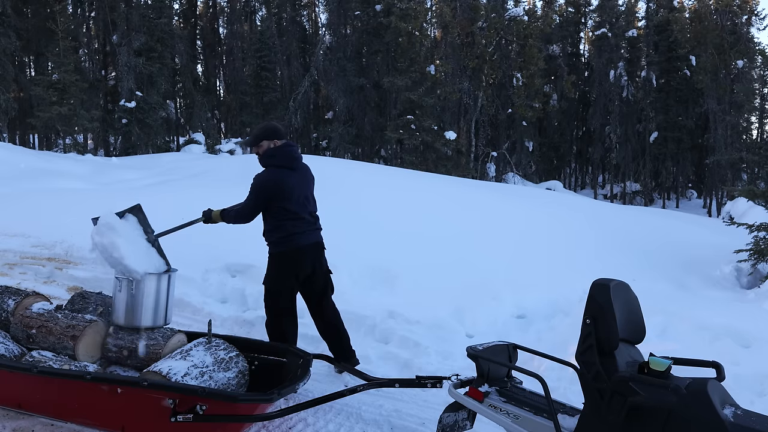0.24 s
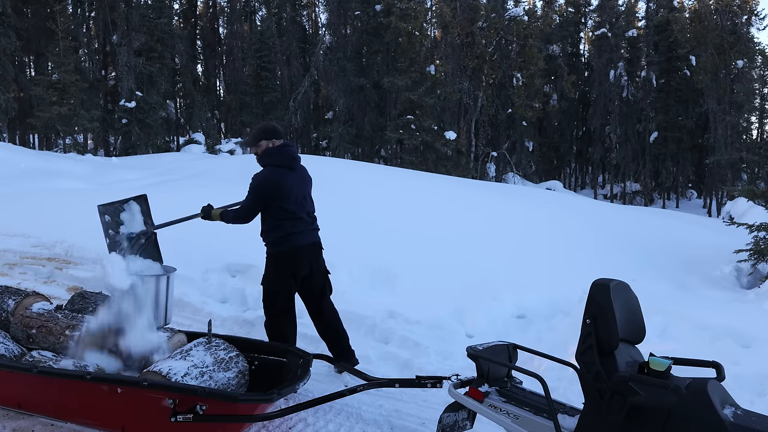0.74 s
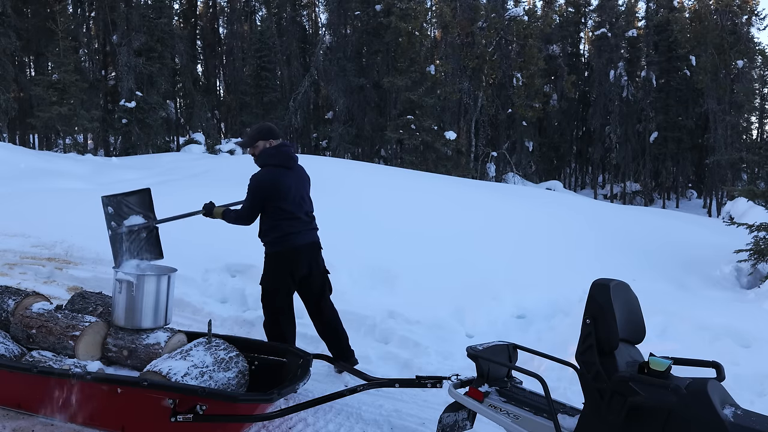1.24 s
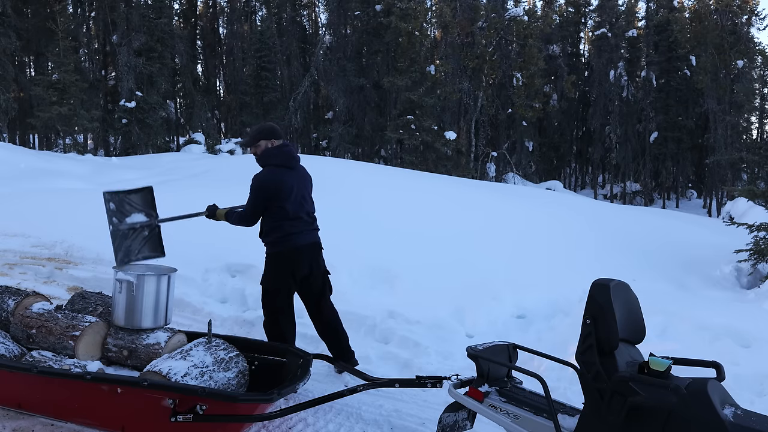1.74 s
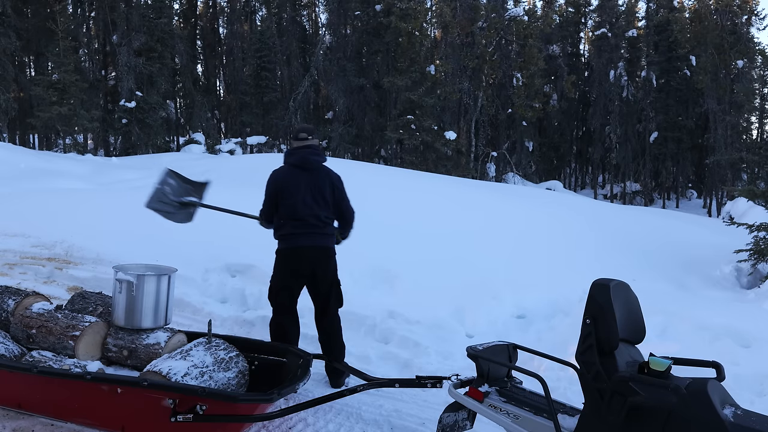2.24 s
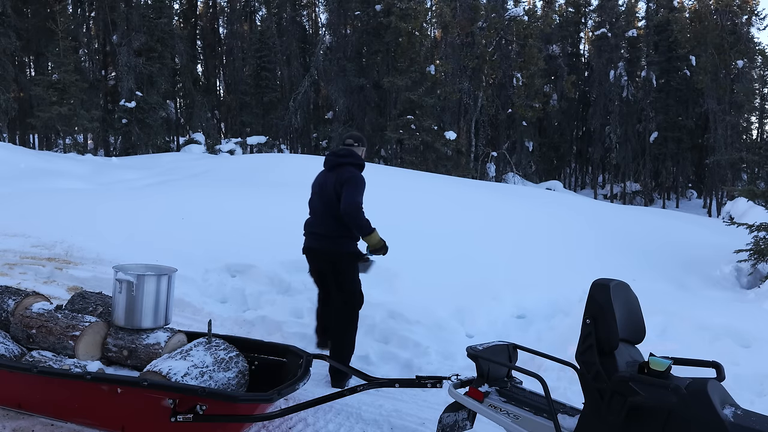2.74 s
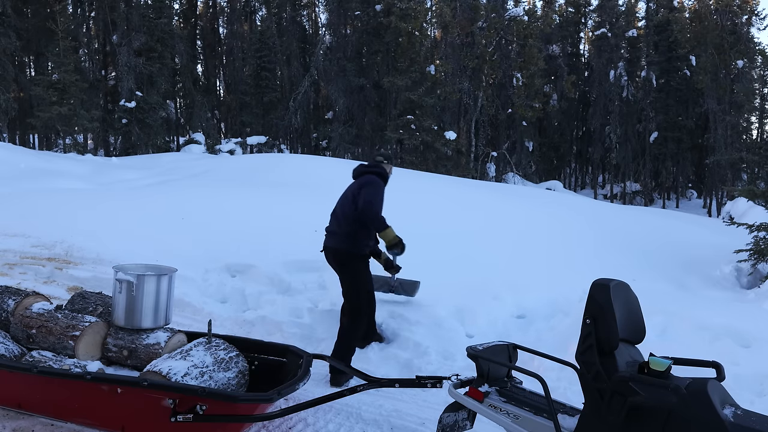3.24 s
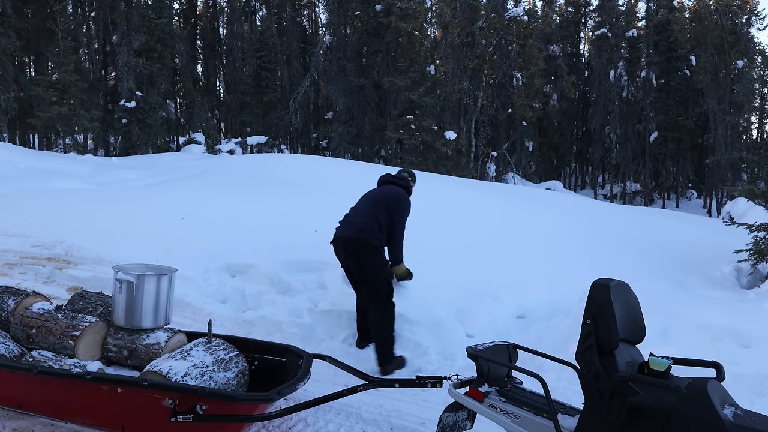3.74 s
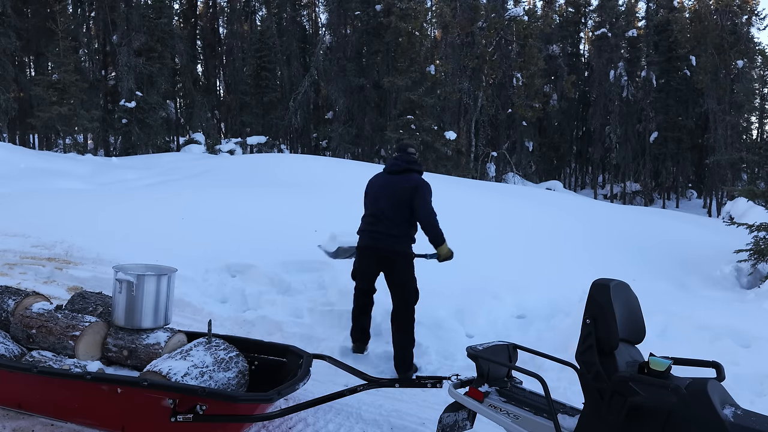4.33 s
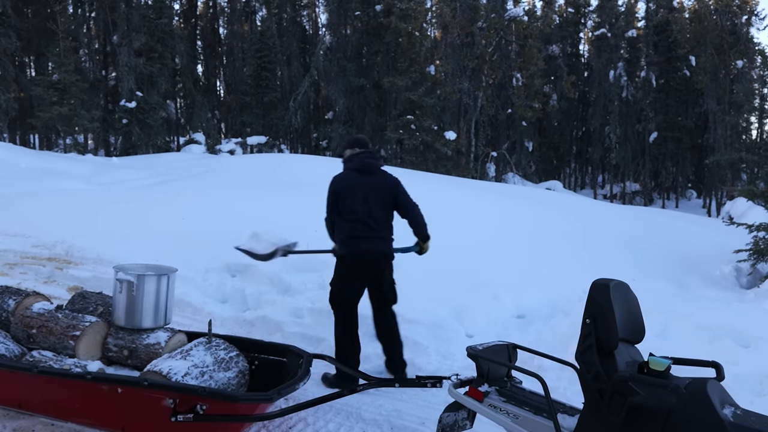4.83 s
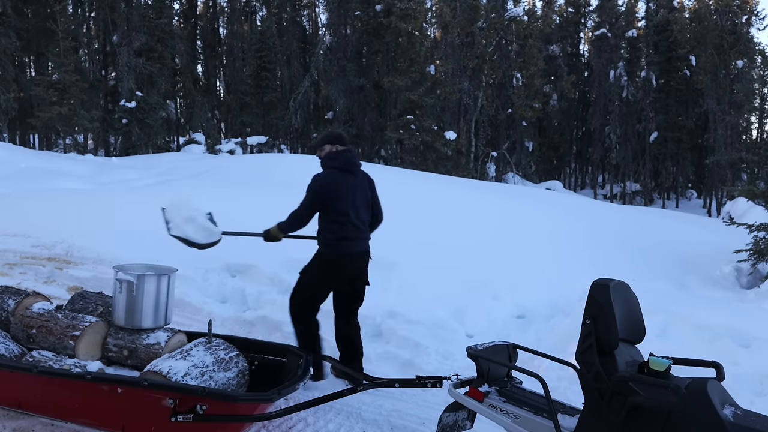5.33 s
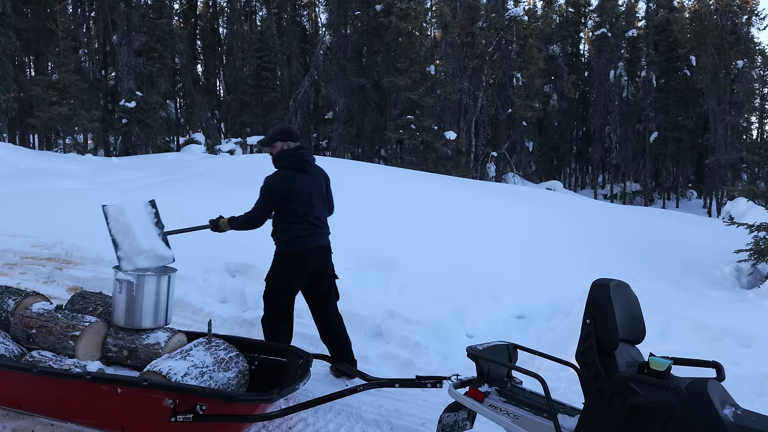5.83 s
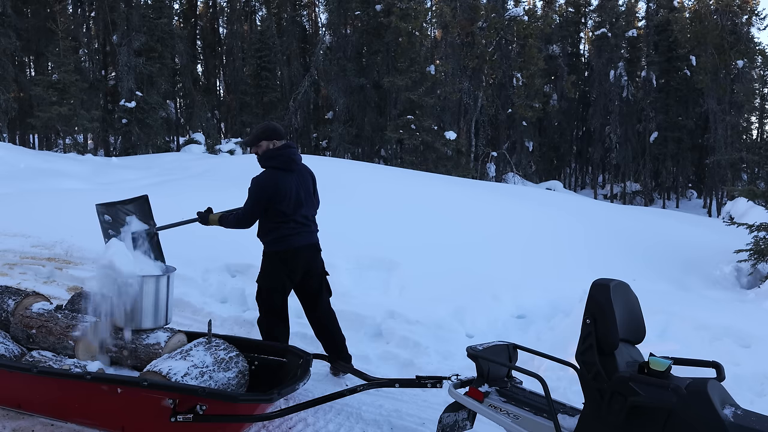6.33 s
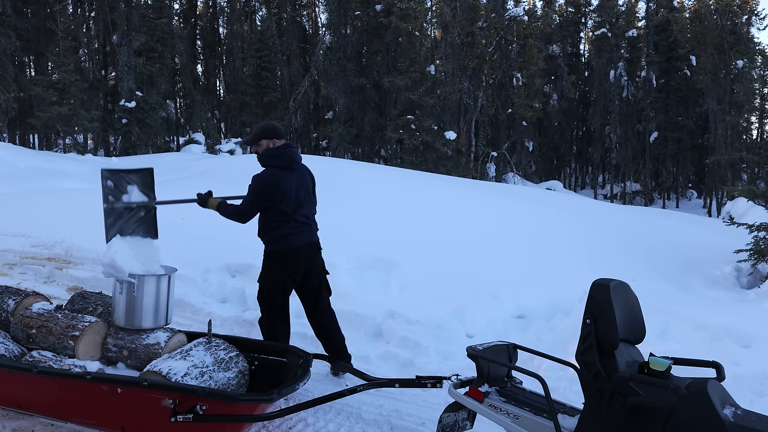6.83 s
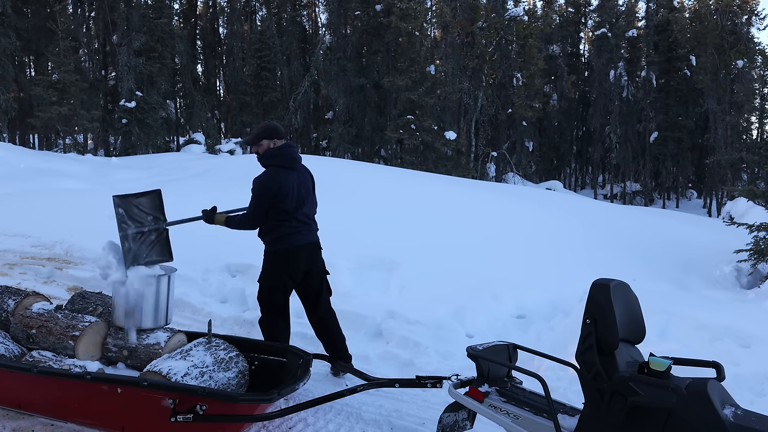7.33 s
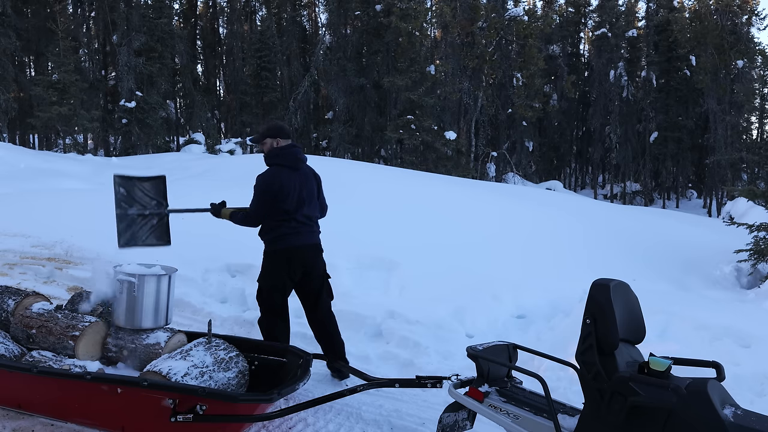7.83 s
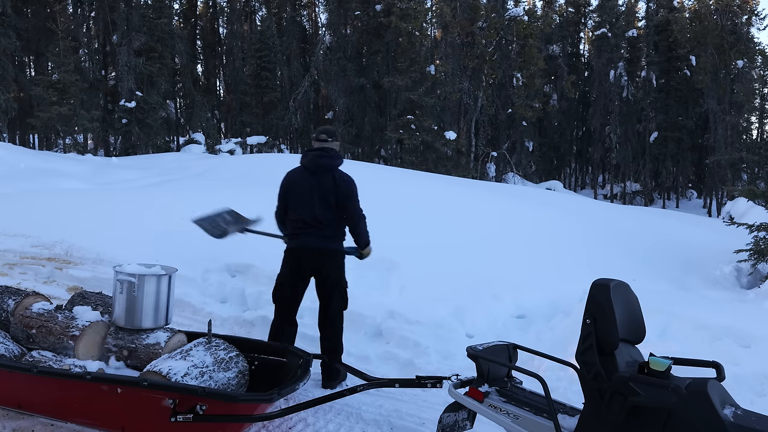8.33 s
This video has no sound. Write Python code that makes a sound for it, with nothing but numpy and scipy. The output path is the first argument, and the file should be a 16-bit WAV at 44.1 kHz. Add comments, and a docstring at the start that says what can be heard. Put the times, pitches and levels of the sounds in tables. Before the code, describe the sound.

Outdoors, a shovelful of snow slides into a pot with light knocks, boots creak, the blade scoops again, lands dully and bangs the rim.

```python
"""Still winter air over deep snow, no echoes, one microphone: a shovel of dry snow is tipped into a metal pot.
The load hisses off the blade, boots creak, crunch and squeak on cold snow, the blade scoops again and returns.
It lands on the pot with a thump; a hard rap on the rim shakes the rest loose.
Snow is filtered grain noise and stick-slip pulses; metal and crust are decaying sine modes.
"""
import sys
import numpy as np
from scipy import signal
from scipy.fft import rfft, irfft, next_fast_len
from scipy.io import wavfile
from scipy.ndimage import uniform_filter1d, map_coordinates

SR = 44100
rng = np.random.default_rng(int(sys.argv[2]) if len(sys.argv) > 2 else 0)


def unload_audio(sound):
    """Save the sound as a 16-bit wav file, at the path given as the first command line argument."""
    columns = np.transpose(np.atleast_2d(sound))
    # keep every value between -1 and 1, then stretch to whole-number steps
    steps = np.round(np.clip(columns, -1, 1) * 32767)
    wavfile.write(sys.argv[1], SR, steps.astype(np.int16))


N = 377496

# All table levels are relative: mix gains and spreads apply after them. t60 = time to fall 60 dB.


def amp(db):
    """Linear gain of a level in dB."""
    return 10 ** (np.asarray(db) / 20)


def unit(x):
    """Scale x to rms 1."""
    return x / np.sqrt(np.mean(x ** 2) + 1e-20)


def add(track, start_s, sound):
    """Mix a sound into a track, cut at the track's end."""
    part = track[max(0, round(start_s * SR)):][:len(sound)]
    part += sound[:len(part)]


def clock(length_s):
    """Sample times [s] over a length."""
    return np.arange(int(length_s * SR)) / SR


def noise(size):
    """White noise."""
    return rng.standard_normal(size)


def colour(x, spectrum):
    """Filter x by (frequency [Hz], gain [dB]) points, log-frequency interpolated, to rms 1."""
    size = next_fast_len(len(x) + 8192)
    point_hz, point_db = np.transpose(spectrum)
    bin_hz = np.fft.rfftfreq(size, 1 / SR)
    gain = amp(np.interp(np.log(bin_hz + 1), np.log(point_hz), point_db))
    return unit(irfft(rfft(x, size) * gain, size)[:len(x)])


def wobble(knots_per_s):
    """Smooth random curve through normal-distributed knots."""
    knots = noise(int(N * knots_per_s / SR) + 4)
    return map_coordinates(knots, [np.arange(N) * knots_per_s / SR])


def steady(x, size=2048):
    """Even out slow level changes by a running rms over size samples."""
    return x / np.sqrt(np.abs(uniform_filter1d(x ** 2, size)) + 1e-9)


def patchy(x, depth_db):
    """Shift the colour of x from moment to moment by a smoothed random time-frequency gain."""
    bins = signal.stft(x, nperseg=512)[2]
    field = uniform_filter1d(noise(bins.shape), size=7, axis=0)
    field = uniform_filter1d(field, size=8, axis=1)
    return signal.istft(bins * amp(depth_db * unit(field)), nperseg=512)[1][:N]


def grains(spectrum, rate_per_s, spread_db, smooth):
    """Tiny fractures of scattered size on an even hiss, coloured to rms 1."""
    sizes = amp(spread_db * np.clip(noise(N), -2, 2))
    ticks = (rng.random(N) < rate_per_s / SR) * rng.choice([-1, 1], N) * sizes
    return colour(unit(ticks) + smooth * noise(N), spectrum)


def stroke(start_s, length_s, db, swell_db, attack_s, release_s):
    """Gain of one movement: sets in, swells evenly, dies away; attack and release are times for 20 dB."""
    t = np.arange(N) / SR - start_s
    outside = np.maximum(-t, 0) / attack_s + np.maximum(t - length_s, 0) / release_s
    swell = swell_db * (np.clip(t / length_s, 0, 1) - .5)
    return amp(db + swell - 20 * np.minimum(outside, 10))


def together(gains):
    """Joint gain of unrelated noises: powers add."""
    return np.sqrt(sum(gain ** 2 for gain in gains))


def strokes(rows, attack_s, release_s):
    """Joint gain of a table of movements."""
    return together(stroke(*row, attack_s, release_s) for row in rows)


# air noise: (frequency [Hz], density [dB])
AIR_SPECTRUM = [(25, 2.5), (60, 2.5), (250, -2), (700, -6.5), (1500, -14), (3000, -16), (7000, -19),
                (12000, -19), (15500, -21)]


def still_air():
    """Steady coloured noise of the open air."""
    return amp(-62.0) * colour(noise(N), AIR_SPECTRUM)


# blade and pot modes, damped by snow: (frequency [Hz], level [dB], t60 [s])
METAL_MODES = [(113.3, -7.5, 0.2), (140, -11, 0.2), (196, -7, 0.15), (334, 1, .13), (408, -6, 0.12),
               (473, -2.5, 0.13), (605.6, 4.5, 0.095), (898, -1, 0.11), (1024, -2.5, 0.087),
               (1505, 0.5, 0.052), (1689, -4, 0.1), (1836, -4, 0.067), (2110, -7, 0.071), (2283, -7, 0.079),
               (2380, -4.5, 0.069), (3150, -12, 0.055), (5080, -10, 0.044)]


def metal(t, low_db, spread_db):
    """Ring of blade and pot at random mode strengths; low_db, the weight behind the blow, feeds low modes."""
    ring = 0
    for hz, db, t60_s in METAL_MODES:
        weight_db = np.interp(hz, [800, 1300], [low_db, 0])
        level_db = db + weight_db + rng.normal(0, spread_db) - 60 * t / t60_s
        ring = ring + amp(level_db) * np.sin(2 * np.pi * (hz * t + rng.random()))
    return ring


# load rubbing over the tilted blade: (start [s], length [s], mid level [dB], swell start to end [dB])
SLIDE_STROKES = [(.02, 0.43, -49.5, 11), (.45, 0.38, -43, -2), (.84, 0.18, -46, 5.5),
                 (1.175, 0.076, -42, -0.5), (1.345, 0.12, -43.5, -7), (6.05, .36, -43.5, 3.5),
                 (6.46, 0.32, -51.5, 0), (7.22, .11, -42.5, 0), (7.62, 0.25, -57.5, 15)]
# clumps pattering down: (start [s], length [s], mid level [dB], swell start to end [dB])
PATTER_STROKES = [(.66, 0.39, -53, 13), (1.18, 0.29, -52.5, -5), (6.06, .12, -50, 4), (6.35, 0.073, -53, 3),
                  (6.72, 0.064, -48, -3), (7.3, 0.17, -50.5, -6)]
# rubbing noise: (frequency [Hz], density [dB])
SCRAPE_SPECTRUM = [(120, -52), (250, 6), (330, 4.5), (450, -4), (600, 0.5), (1000, 0.5), (1700, -4.5),
                   (2500, -6.5), (4000, -8), (7000, -16.5), (16000, -28)]
# clump noise: (frequency [Hz], density [dB])
CLUMP_SPECTRUM = [(30, -27), (70, -9), (130, -0.5), (200, -10.5), (400, -2), (1000, -28)]
CRUMBS_DB = -20.5  # small clumps shed by every slide, relative to its gain


def sliding_snow():
    """Snow rubs the blade and stirs its modes; clumps patter down."""
    sliding = strokes(SLIDE_STROKES, attack_s=0.029, release_s=0.059)
    patter = strokes(PATTER_STROKES, attack_s=0.047, release_s=0.089)
    falling = together([patter, amp(CRUMBS_DB) * sliding])
    rub = grains(SCRAPE_SPECTRUM, rate_per_s=1800, spread_db=0.5, smooth=0.45)
    blade_ring = metal(clock(.15), low_db=-15.0, spread_db=1.0)
    blade = unit(signal.fftconvolve(rub, blade_ring)[:N])
    scrape = steady(patchy(rub + 0.32 * blade, depth_db=2.5)) * amp(-0.5 + 1.3 * wobble(45))
    clumps = steady(grains(CLUMP_SPECTRUM, rate_per_s=90, spread_db=5, smooth=0.84), size=3000)
    return sliding * scrape + falling * clumps


# powder pouring off the blade: (peak time [s], level [dB], rise per 20 dB [s], fall per 20 dB [s])
POUR_SWELLS = [(.05, -56.5, .6, 1.5), (.78, -43.5, 0.83, 0.57), (1.17, -56, .1, 0.2),
               (1.38, -56, .15, 0.15), (2.14, -60, 0.39, .5), (6.36, -49, 0.51, 0.42),
               (6.761, -55.5, .4, 0.58), (7.215, -48, 0.016, .55), (7.65, -56, 0.14, 1),
               (8.11, -51, .7, 0.86)]
# blade edge cutting or brushing the drift: (start [s], length [s], mid level [dB], swell start to end [dB])
CUT_STROKES = [(3.12, 0.28, -47, 0.5), (3.465, .055, -45, 11), (3.54, 0.091, -43, -11),
               (3.73, 0.14, -61, -7), (3.98, 0.058, -49, 3.5), (4.25, 0.034, -53, -2),
               (4.37, 0.074, -55, 1.5), (4.795, 0.018, -45, 1), (4.85, 0.048, -52, -3),
               (5.19, 0.064, -54.5, 0), (8.3, 0.083, -50, -1.5)]
# loose crystals: (frequency [Hz], density [dB])
CRYSTAL_SPECTRUM = [(300, -5), (1000, 3), (2000, 3), (4000, 2), (6000, -2), (8000, -2), (12000, -5.5),
                    (16000, -7)]


def powder():
    """Loose crystals hiss as they pour off the blade or as its edge cuts the drift."""
    t = np.arange(N) / SR
    pours = []
    for peak_s, db, rise_s, fall_s in POUR_SWELLS:
        distance = np.maximum((peak_s - t) / rise_s, (t - peak_s) / fall_s)
        pours.append(amp(db - 20 * distance))
    cutting = strokes(CUT_STROKES, attack_s=0.03, release_s=0.043)
    flow = together([together(pours), cutting])
    bright = grains(CRYSTAL_SPECTRUM, rate_per_s=3500, spread_db=3.0, smooth=0.67)
    return patchy(flow * bright * amp(2.5 + 1.8 * wobble(70)), depth_db=1.96)


# blade meets pot: (time [s], level [dB], body re level [dB], edge re level [dB])
KNOCK_HITS = [(0.0899, -36.5, 9, -7), (1.453, -31.5, -12, -19), (1.5303, -43.5, 3, -8),
              (1.7136, -26.5, -11.5, -4.5), (1.7732, -32.5, -6.5, -5), (1.8158, -38.5, -8, -8),
              (6.0286, -23, 1, -31), (6.8543, -36, -30, -24), (7.318, -10.5, 3, -5), (7.3215, -20, 8.5, -9),
              (7.3327, -20.5, 9, -13), (7.346, -19.5, 5, -17), (7.3689, -17.5, -2, -10),
              (7.384, -22, 4, -17), (7.8854, -29, -24, -1)]


def knocks():
    """Each contact rings the metal, with a low push, short clatter, bright edge and faint rattle."""
    out, t = np.zeros(N), clock(0.36)

    def burst(spectrum, t60_s):
        return colour(noise(len(t)), spectrum) * amp(-60 * t / t60_s)

    for time_s, db, body_db, edge_db in KNOCK_HITS:
        ring = metal(t, low_db=min(body_db, 5), spread_db=1.0)
        push = burst([(35, -40), (115, 5.5), (350, 2), (650, 2), (950, -1), (1500, -39)], t60_s=0.065)
        clatter = burst([(500, -22), (1000, -1.5), (1800, 0.0), (3000, -2.5), (4200, -9.5), (7000, -24.5)],
                        t60_s=0.03)
        edge = burst([(2500, 1), (5000, 4.5), (9000, 0.5), (16000, -11)], t60_s=0.028)
        rattle = burst([(100, -10), (350, -10), (1000, -7), (2500, -10), (8000, -25), (16000, -47)],
                       t60_s=0.2)
        blow = amp(-15) * ring + amp(body_db - 13) * push + amp(-5.5) * clatter
        blow += amp(edge_db - 3) * edge + amp(-21.5) * rattle
        add(out, time_s, amp(db) * blow * (1 - np.exp(-t / 0.00036)))
    return out


# blade edge dragging over the rim: (start [s], length [s], level [dB])
RIM_DRAGS = [(0.093, 0.05, -46), (0.761, 0.067, -41), (0.964, 0.055, -47), (1.147, 0.045, -53),
             (1.225, 0.051, -42.5), (1.318, 0.12, -39.5), (1.448, 0.056, -46), (1.749, 0.041, -42.5),
             (6.033, 0.06, -44.5), (7.213, 0.15, -45), (7.88, 0.068, -46.5)]
# grit: (frequency [Hz], density [dB])
GRIT_SPECTRUM = [(500, -13), (1000, 7), (1500, 0.5), (2500, -3), (4000, -8), (6000, -17.5), (10000, -37),
                 (16000, -42)]


def drags():
    """The edge chatters over the rim in uneven catches; the contact keeps the ring short."""
    out, catch = np.zeros(N), amp(2.3 * wobble(110))
    for start_s, length_s, db in RIM_DRAGS:
        t = clock(length_s)
        catches = rng.random(len(t)) < 700 / SR
        chatter = noise(len(t)) * (0.62 + catches * 7)
        ring = signal.fftconvolve(chatter, metal(clock(0.026), low_db=0, spread_db=2))[:len(t)]
        rasp = colour(ring, [(100, -22), (300, -9), (600, -1), (1500, -1.5), (5000, 2)])
        rasp += 0.64 * colour(chatter, GRIT_SPECTRUM)
        press = np.sqrt(np.minimum(t / 0.011, 1) * (1 - t / length_s))
        press *= catch[int(start_s * SR):][:len(t)]
        add(out, start_s, amp(db) * unit(rasp) * press)
    return out


# lump of snow drops, or a weight sinks into the drift: (time [s], level [dB])
THUD_HITS = [(0.094, -50), (0.924, -40), (.95, -34), (1.179, -35.5), (1.741, -37.5), (3.491, -35),
             (3.55, -37), (3.6, -37), (3.713, -34), (4.8, -36.5), (5.19, -37), (5.286, -42), (6.736, -35),
             (7.405, -32.5)]


def thuds():
    """Snow has no ring: each hit gives one soft, low noise puff."""
    out, t = np.zeros(N), clock(.15)
    for time_s, db in THUD_HITS:
        puff = colour(noise(len(t)), [(30, -16), (70, -6), (130, -2), (220, -8), (500, -21), (1200, -32.5)])
        add(out, time_s, amp(db - 4 - 60 * t / 0.12) * puff * (1 - np.exp(-t / 0.0034)))
    return out


def slips(times_s, hz, size, scatter, cycles, spread_db):
    """Each slip rings the snow underfoot for a few cycles; returns the ring and the fracture envelope."""
    t = clock(.025)
    chance = np.clip(noise((len(times_s), 2)), -2, 2)
    phase = (hz * np.exp(scatter * chance[:, 0]))[:, None] * t  # [cycles]
    force = amp(spread_db * chance[:, 1:])
    motion = np.sin(2 * np.pi * phase) * amp(-60 * phase / cycles) * (1 - np.exp(-phase / 0.47)) ** 2
    ring = np.gradient(motion, axis=1)  # pressure follows the change of motion: no net push
    fracture = np.broadcast_to(amp(-60 * t / .015), ring.shape)
    where = ((times_s * SR).astype(int)[:, None] + np.arange(len(t))).ravel()

    def gather(rows):
        return np.bincount(where, (force * rows).ravel(), size)[:size]

    return gather(ring), gather(fracture)


# boot leaning on packed snow: (start [s], length [s], mid level [dB], swell start to end [dB], nominal pitch [Hz])
CREAK_STEPS = [(1.878, 0.48, -45, 6.5, 630), (2.386, 0.099, -33.5, 7.5, 610), (2.6, .5, -52, 2, 583),
               (3.137, 0.28, -39.5, -5.5, 505), (3.494, 0.081, -34.5, 9.5, 443),
               (3.735, 0.065, -48, -2, 545), (3.997, 0.071, -45, 6, 494), (4.24, .22, -57, 5, 544),
               (4.725, .14, -38.5, 8, 590), (4.977, 0.086, -56, 5, 564), (5.17, 0.11, -37, -1, 546),
               (5.608, 0.21, -40, 3, 530), (5.833, 0.11, -47, -6, 500), (7.92, 0.21, -45, 5, 625),
               (8.159, .27, -40, 11, 494)]
STEP_ATTACK_S, STEP_RELEASE_S = 0.054, 0.091  # per 20 dB
CREAK_SAG = 0.16  # fall of the nominal pitch over a step, as a share


def footfall():
    """Gain and nominal pitch of the creak: pitch sags as snow packs under a step; the strongest step leads."""
    t = np.arange(N) / SR
    gains, pitches = [], []
    for start_s, length_s, db, swell_db, hz in CREAK_STEPS:
        gains.append(stroke(start_s, length_s, db, swell_db, STEP_ATTACK_S, STEP_RELEASE_S))
        progress = np.clip((t - start_s) / length_s, 0, 1)
        pitches.append(hz * (1 - CREAK_SAG * (progress - .5)))
    gains = np.array(gains)
    return together(gains), np.average(pitches, axis=0, weights=gains ** 2)


# muffled crystals under the sole: (frequency [Hz], density [dB])
MUFFLED_SPECTRUM = [(300, -27), (1000, 13), (3000, 4), (5500, 0), (8000, -4.5), (12000, -9.5), (16000, -16)]
SLIPS_PER_S, FULL_PACE_DB = 170, -48  # mean full-pace rate; weaker creaks slip more slowly
KICK_DB, KICK_DB_PER_DB = -32.5, 0.57  # crushed crystals: base level, growth with creak level


def creak():
    """Uneven stick-slip rings the crust and crushes crystals; a deeper creak shakes pack and drift more."""
    gain, hz = footfall()
    pace = np.clip(gain / amp(FULL_PACE_DB), .35, 1)
    count = np.cumsum(SLIPS_PER_S * pace * np.exp(.35 * wobble(60))) / SR
    at = np.flatnonzero(np.diff(np.floor(count)))
    crust_hz, pack_hz = 715 * (hz[at] / 700) ** 0.54, 320 * (hz[at] / 550) ** 0.61
    ring, fracture = slips(at / SR, crust_hz, N, scatter=0.18, cycles=15.0, spread_db=1.0)
    pack, _ = slips(at / SR, pack_hz, N, scatter=0.32, cycles=6.6, spread_db=2.5)
    drift = colour(noise(N), [(30, -19), (80, 4), (150, 7), (250, 6.0), (400, -29.5)])
    depth = np.clip(1.34 - hz / 700, .2, .7)
    grit = steady(fracture * colour(noise(N), GRIT_SPECTRUM))
    low = steady(pack) + amp(-14.0) * drift
    body = steady((1 - depth) * steady(ring) + depth * low)
    crushed = grains(MUFFLED_SPECTRUM, rate_per_s=1500, spread_db=4.0, smooth=0.67)
    crushed *= amp(KICK_DB + 1.6 * wobble(70))
    return gain * (body + amp(-10) * grit) + gain ** KICK_DB_PER_DB * crushed


# sole twisting on snow: (start [s], length [s], level [dB], nominal start pitch [Hz], nominal end pitch [Hz])
SQUEAK_GLIDES = [(2.499, 0.057, -31.5, 326, 426), (2.545, 0.043, -35, 586, 700),
                 (8.03, 0.108, -34, 520, 433)]


def squeaks():
    """The slips lock into a brief, wavering glide with a weak second harmonic."""
    out, waver = np.zeros(N), wobble(170)
    for start_s, length_s, db, start_hz, end_hz in SQUEAK_GLIDES:
        t = clock(length_s)
        hz = np.linspace(start_hz, end_hz, len(t))
        hz *= 1 + 0.034 * waver[int(start_s * SR):][:len(t)]
        phase = 2 * np.pi * np.cumsum(hz) / SR
        swell = np.sqrt(np.abs(np.sin(np.pi * t / length_s)))
        add(out, start_s, amp(db) * swell * (np.sin(phase) + 0.16 * np.sin(2 * phase)))
    return out


CRUNCH_POWDER_DB = -7.5  # re grit


def crunch(length_s, body_db, hz, grit_db):
    """A fast run of slips, each with a spray of grit and powder."""
    count = max(1, round(length_s * 340))
    times_s = (np.arange(count) + rng.uniform(0, 0.888, count)) * length_s / count
    size = int((length_s + .03) * SR)
    crust_hz, pack_hz = 730 * (hz / 650) ** 0.77, 330 * (hz / 600) ** 0.43
    ring, fracture = slips(times_s, crust_hz, size, scatter=0.13, cycles=10.5, spread_db=4)
    pack, _ = slips(times_s[::2], pack_hz, size, scatter=.27, cycles=5.7, spread_db=4)

    def spray(spectrum):
        return unit(fracture * colour(noise(size), spectrum))

    body = unit(unit(ring) + 0.82 * (600 / hz) ** 2.5 * unit(pack))
    dust = spray(GRIT_SPECTRUM) + amp(CRUNCH_POWDER_DB) * spray(CRYSTAL_SPECTRUM)
    return (amp(body_db) * body + amp(grit_db) * dust) * np.sqrt(length_s * SR / size)


# snow giving way in slip runs: (start [s], length [s], body level [dB], nominal pitch [Hz], grit level [dB])
CRUNCH_RUNS = [(2.615, 0.02, -38.5, 503, -49.5), (2.669, .016, -32.5, 567, -44.5),
               (2.709, .016, -32.5, 594, -44.5), (2.766, 0.033, -32, 635, -44.5),
               (2.852, .034, -29, 614, -42), (2.954, 0.031, -28, 664, -44),
               (3.029, 0.035, -30, 561.5, -43.5), (3.109, 0.021, -36.5, 540, -55.5),
               (3.154, .017, -28.5, 580, -41), (3.394, .01, -38, 700, -41), (3.711, 0.021, -34.5, 447, -40),
               (4.046, 0.019, -37.5, 440, -44.5), (4.146, 0.028, -38, 575, -43.5),
               (4.749, .012, -35.5, 543.3, -39), (4.791, 0.03, -33, 465, -35.5),
               (5.107, 0.016, -37.5, 666, -45.5), (5.185, .016, -36, 549.6, -39),
               (5.302, .006, -23, 719, -45), (5.625, .024, -33, 640, -38), (5.7, 0.053, -32, 504, -40),
               (5.786, 0.039, -35, 525, -43), (8.343, 0.037, -33, 506, -47.5),
               (8.391, .021, -33.5, 420, -45), (8.441, .02, -34.5, 570, -43.5)]
LONG_RUN_S = .025
LEAD_S, LEAD_LENGTH_S, LEAD_DB = .02, .005, -9  # weaker slips before a long run: lead time, length, gain


def crunches():
    """A boot breaks through; before a long run the snow first gives a little."""
    out = np.zeros(N)
    for start_s, length_s, body_db, hz, grit_db in CRUNCH_RUNS:
        add(out, start_s, crunch(length_s, body_db, hz, grit_db))
        if length_s > LONG_RUN_S:
            add(out, start_s - LEAD_S, amp(LEAD_DB) * crunch(LEAD_LENGTH_S, body_db, hz, grit_db))
    return out


# hollow crust modes: (nominal frequency [Hz], level [dB], t60 [s])
CRUST_MODES = [(259, -6.5, 0.053), (420, -1.5, .032), (745, -1, 0.023)]


def crack(grit_db):
    """A lone fracture: a spit of grit and a short hollow ring of the crust at peak 1."""
    t = clock(0.055)
    ring = np.zeros(len(t))
    for hz, db, t60_s in CRUST_MODES:
        level_db = db + rng.normal(0, 3.5) - 60 * t / t60_s
        ring += amp(level_db) * np.sin(2 * np.pi * hz * np.exp(rng.normal(0, 0.13)) * t)
    ring *= 1 - np.exp(-t / .0015)
    spit = colour(noise(len(t)), [(600, -9), (1400, 3), (4000, -5.5), (8000, -15.5), (16000, -14.5)])
    return ring / np.abs(ring).max() + amp(grit_db - 60 * t / 0.034) * spit


# single crust cracks: (time [s], ring peak [dB], grit re ring peak [dB])
CRACK_HITS = [(2.669, -27, -16), (3.397, -28, -10), (3.488, -33, -12), (3.917, -42.5, -11.5),
              (4.089, -35.5, -17), (4.365, -29, -11), (4.401, -29, -18), (4.435, -31, -15),
              (4.487, -31.5, -10.5), (4.522, -36, -11), (4.566, -38, -11.5), (4.647, -28.5, -11),
              (4.652, -28.5, -13.5), (4.688, -29, -8), (4.822, -24.5, -22), (4.939, -27, -12.5),
              (4.996, -31.5, -11), (5.016, -24, -11.5), (5.062, -36, -7.5), (5.084, -38.5, -8),
              (5.119, -30, -23), (5.392, -44.5, -4.5), (5.516, -40.5, -12), (5.627, -22.5, -23),
              (6.592, -30, -8), (6.662, -29.5, -9), (6.782, -31, -6.5), (7.019, -37, -12),
              (7.064, -37.5, -21), (7.087, -36, -9)]
AFTER_S, AFTER_DB = 0.018, -13.5  # weaker second crack: mean delay, mean gain


def cracks():
    """The crust cracks, and a moment later once more, weakly."""
    out = np.zeros(N)
    for time_s, db, grit_db in CRACK_HITS:
        add(out, time_s, amp(db) * crack(grit_db))
        after_s = time_s + AFTER_S * rng.uniform(.5, 1.5)
        add(out, after_s, amp(db + AFTER_DB + rng.normal(0, 1.9)) * crack(grit_db))
    return out


# loaded blade landing: (time [s], level [dB])
LANDING_HITS = [(5.9525, -6), (5.9645, -36), (5.98, -25)]
# choked blade modes: (frequency [Hz], level [dB], t60 [s])
THUMP_MODES = [(327, 1, 0.035), (387, 2, 0.021), (654, -7.5, 0.031), (995, -17.5, 0.043)]


def landing():
    """The load of snow chokes the blade, leaving a few low cycles and a rough rattle."""
    out, t = np.zeros(N), clock(0.14)
    thump = sum(amp(db - 60 * t / t60_s) * np.sin(2 * np.pi * hz * t) for hz, db, t60_s in THUMP_MODES)
    thump *= (1 - np.exp(-t / 0.0018)) ** 2
    for time_s, db in LANDING_HITS:
        rasp = colour(noise(len(t)), GRIT_SPECTRUM) * amp(-34 - 60 * t / 0.078)
        rattle = colour(noise(len(t)), [(130, -30), (280, 4), (1000, -10.5), (2000, -19.5), (5000, -40.5)])
        rattle *= amp(-22.5 - 60 * t / 0.19)
        add(out, time_s, amp(db + 3) * (thump + rasp + rattle))
    return out


def scene():
    """Boots and shovel in still air, identical in both channels."""
    shovel = sliding_snow() + powder() + knocks() + drags() + thuds() + landing()
    boots = amp(-1) * creak() + squeaks() + crunches() + cracks()
    return np.tile(still_air() + shovel + boots, (2, 1))


LOW_CUT_HZ, TOP_HZ = 40, 15900


def record(dry):
    """The microphone path: first-order low cut and a sharp upper band limit."""
    size = next_fast_len(N + SR // 2)
    hz = np.fft.rfftfreq(size, 1 / SR)
    low_cut = 1j * hz / (1j * hz + LOW_CUT_HZ)
    return irfft(rfft(dry, size) * low_cut * (hz < TOP_HZ), size)[:, :N]


dry = scene()
out = record(dry)
unload_audio(out)
```